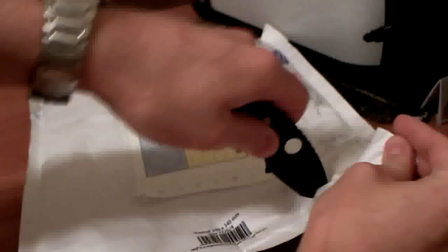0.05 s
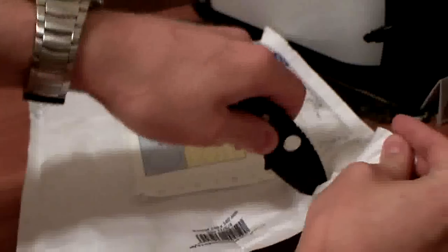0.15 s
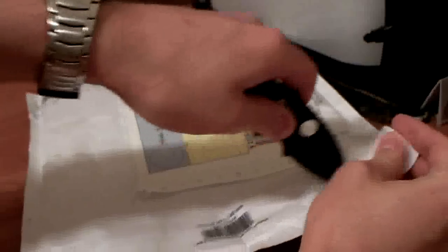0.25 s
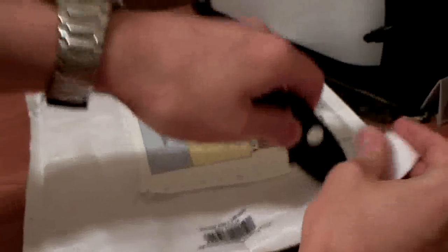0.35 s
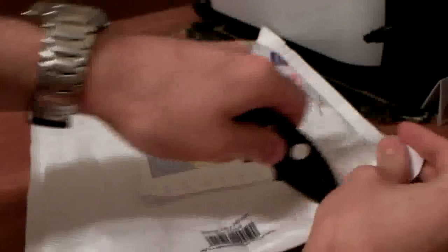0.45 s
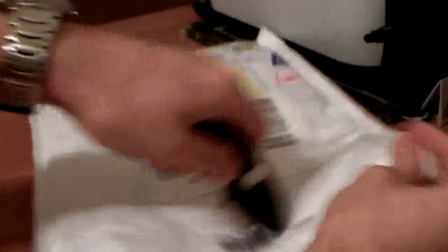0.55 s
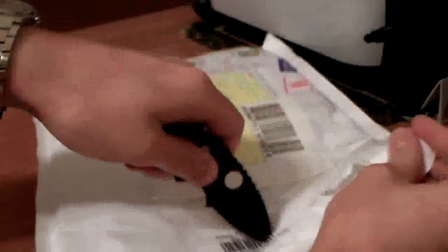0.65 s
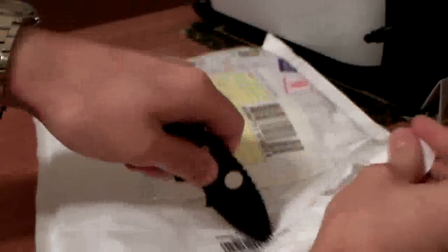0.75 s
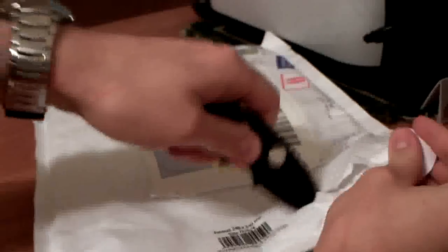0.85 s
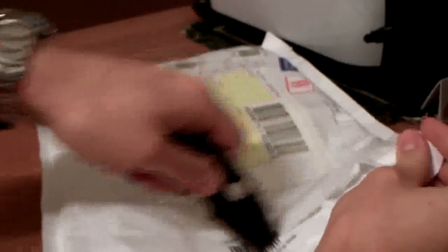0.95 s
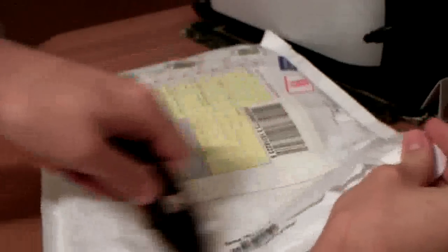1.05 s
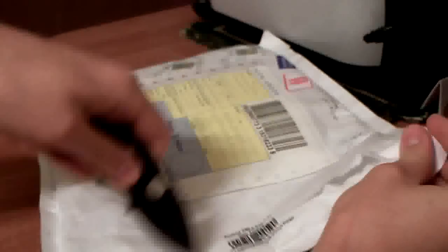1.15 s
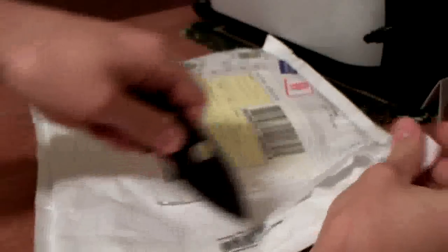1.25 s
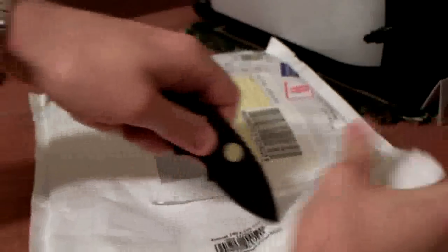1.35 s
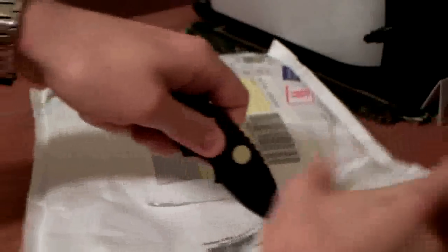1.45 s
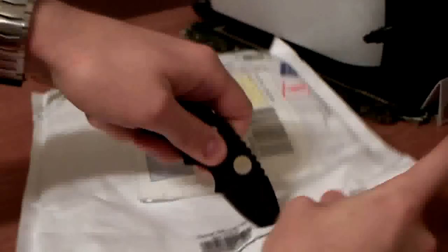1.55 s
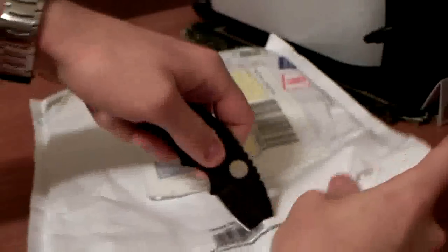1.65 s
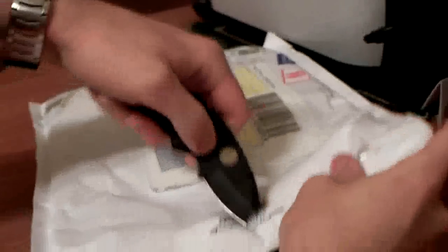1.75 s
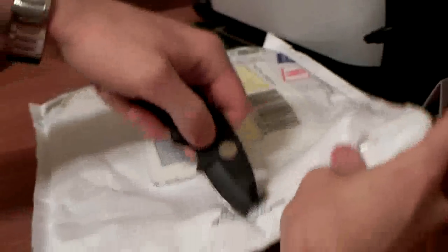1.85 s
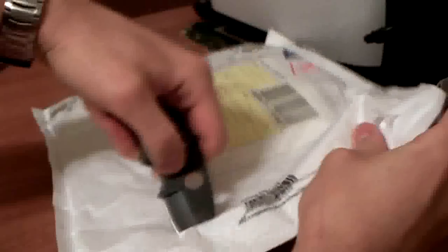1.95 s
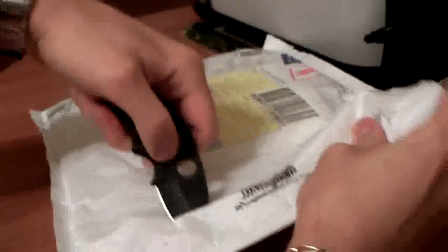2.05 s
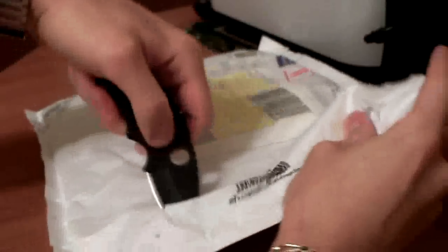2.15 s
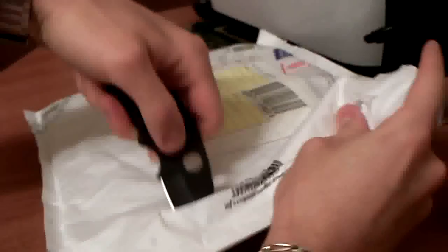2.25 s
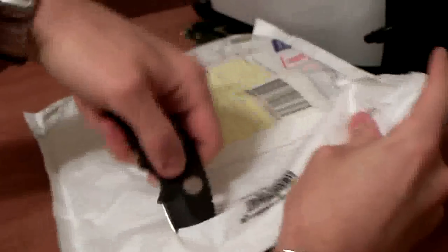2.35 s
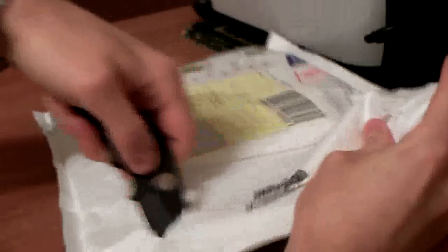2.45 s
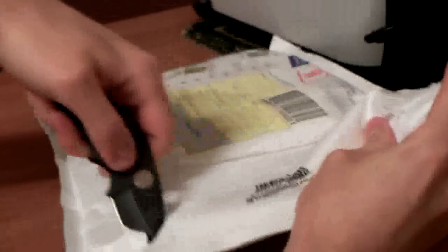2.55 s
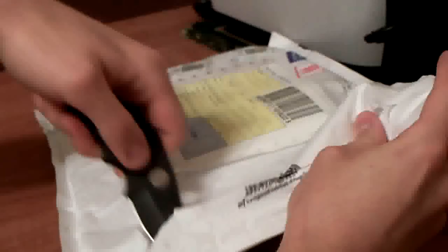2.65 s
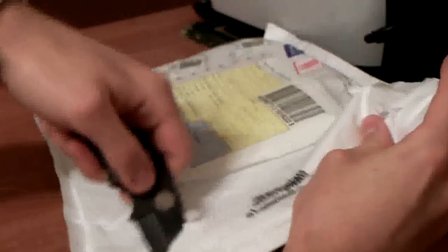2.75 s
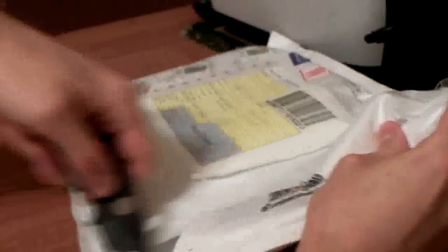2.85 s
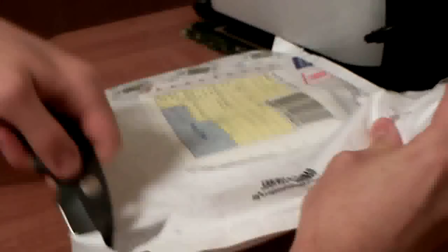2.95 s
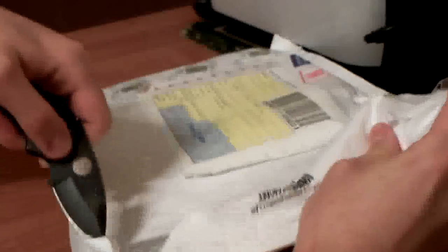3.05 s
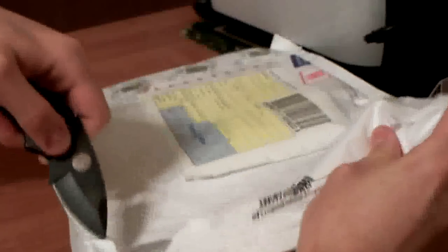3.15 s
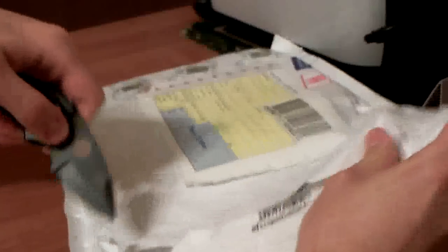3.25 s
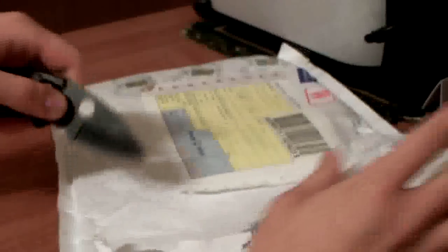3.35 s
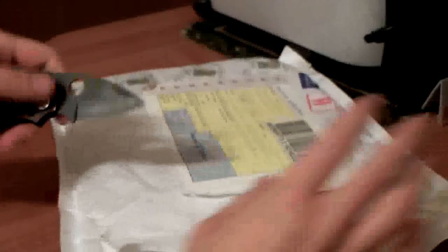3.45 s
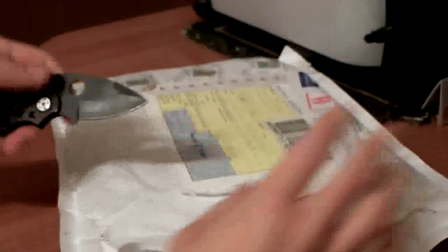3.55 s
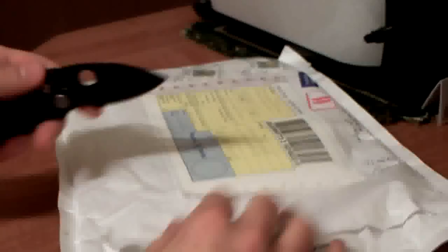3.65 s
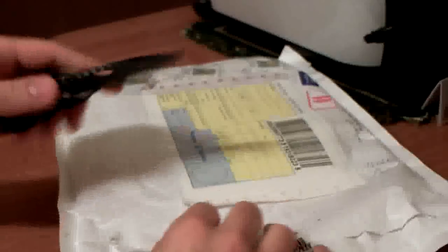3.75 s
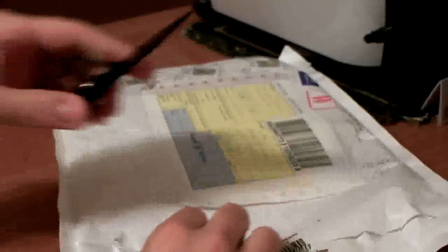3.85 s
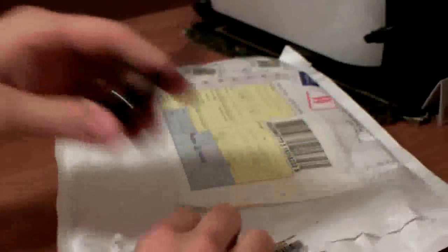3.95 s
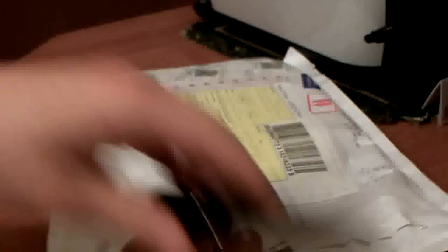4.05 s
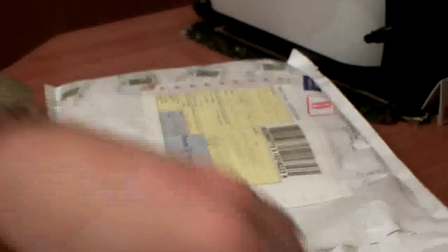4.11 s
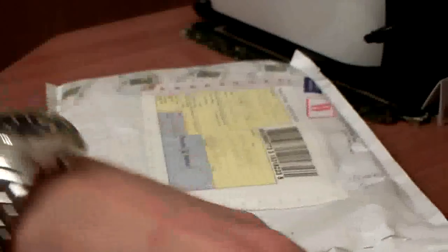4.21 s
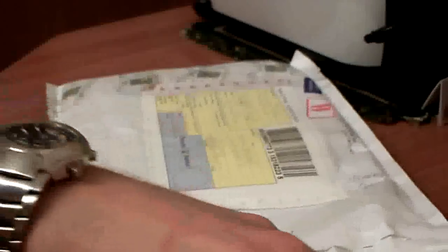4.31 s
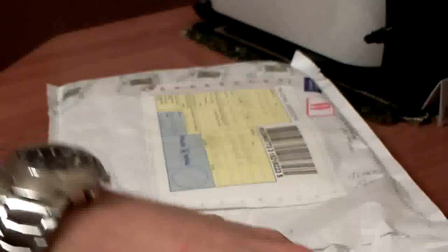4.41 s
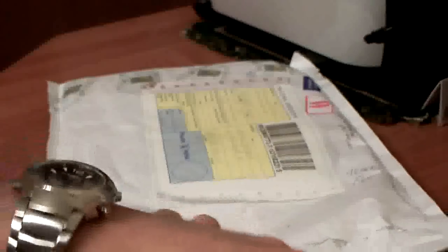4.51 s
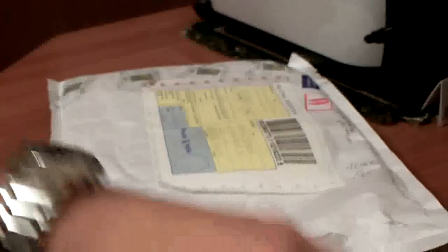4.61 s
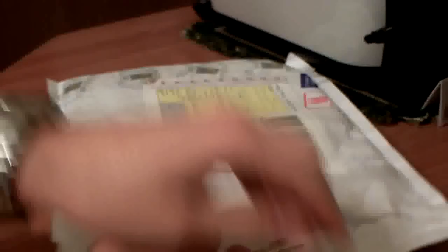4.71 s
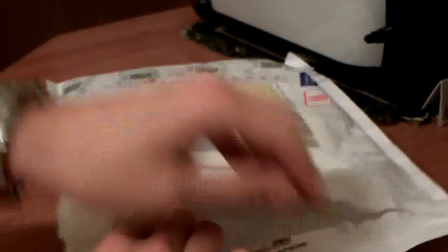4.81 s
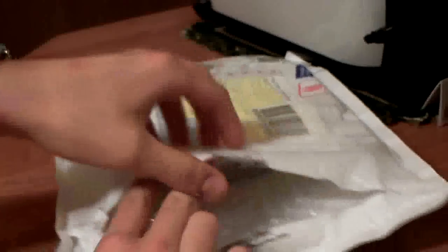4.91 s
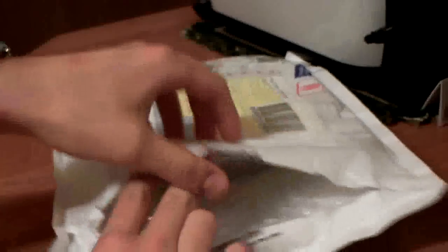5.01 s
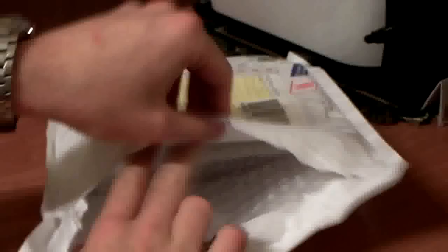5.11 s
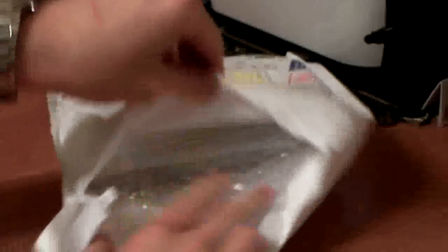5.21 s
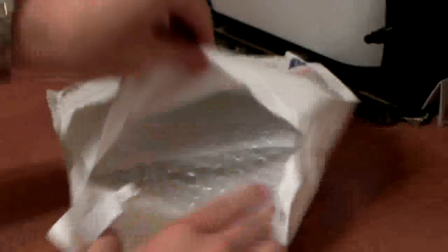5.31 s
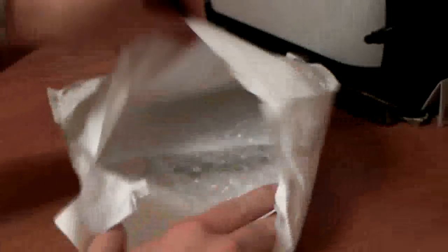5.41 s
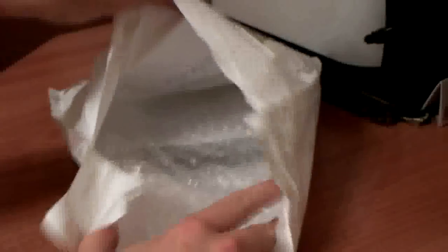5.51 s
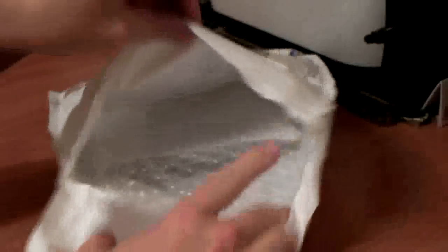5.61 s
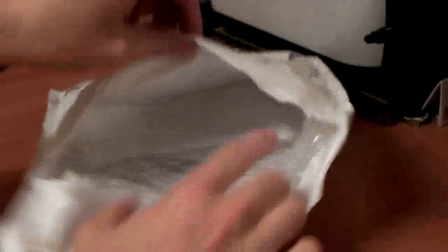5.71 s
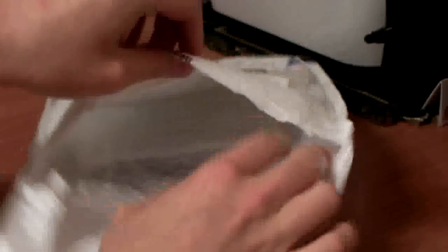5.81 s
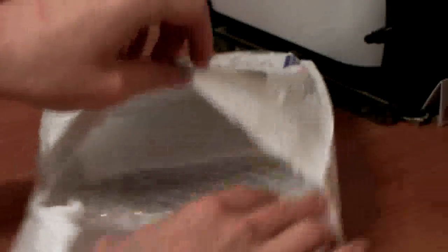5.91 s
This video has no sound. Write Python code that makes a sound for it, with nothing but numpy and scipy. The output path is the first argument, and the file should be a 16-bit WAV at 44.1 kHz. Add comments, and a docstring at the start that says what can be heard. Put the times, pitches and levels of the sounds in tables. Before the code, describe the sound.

Close by in a small room, a knife slits a padded paper mailer in short, uneven rips, with crackling fibres and snapping creases. The cutting eases into a softer rustle. The knife is put down on a wooden desk with a knock, and a hand thumps down just after. Then the mailer is pulled open with dense crinkling, sharp pops and a low, hollow rustle, over soft hiss and a faint hum.

```python
"""Short, crackly rips come first: a knife slits a padded paper mailer on a wooden desk.
The knife is laid down with a knock, a hand thumps onto the desk and pulls the mailer open.
Tearing fibres crackle, creases snap, the lining fizzes and the hollow pouch rustles low.
Behind it all is a small room with a soft hiss and a faint hum."""
import sys
import numpy as np
from scipy import signal
from scipy.fft import rfft, irfft
from scipy.io import wavfile
from scipy.ndimage import uniform_filter1d

SR = 44100
rng = np.random.default_rng(int(sys.argv[2]) if len(sys.argv) > 2 else 0)


def store_pcm(level_fs):
    """Save levels as 16-bit WAV."""
    pcm = np.round(np.clip(level_fs, -1, 1) * 32767).astype(np.int16)
    wavfile.write(sys.argv[1], SR, np.atleast_2d(pcm).T)


N = 263277

# The tone of the paper, lining, hollow pouch and desk beneath: f/Hz, relative level/dB
PAPER_TONE = [(760, -30), (1300, -2), (1450, -1.5), (2030, -6.5), (2210, -3.5), (2810, -4), (3050, -2.5),
              (3600, -13.5), (4680, -53), (7920, -120)]
LINING_TONE = [(2000, -32), (3400, -5), (3740, -0.5), (4460, -0.5), (4830, 3), (5730, 0), (7640, 3),
               (8150, 2.5), (9770, 4), (10300, 5), (11300, -9), (14700, -48), (22000, -120)]
POUCH_TONE = [(210, -42.5), (350, -1.5), (477, -16), (563, -1.5), (889, 0.5), (998, 4), (1260, -3),
              (1500, -10.5), (1950, -24), (3300, -120)]
THUD_TONE = [(35, -43), (60, -15), (194, -12.5), (345, -0.5), (387, 5.5), (420, -4), (550, -4.5),
             (920, -120)]
def mailer():
    """Tiny tears sound through the pouch, the paper, the lining and the desk beneath."""
    paper, lining, pouch = strokes()
    thud = gain_of(-37.5) * (pouch * gain_of(30)) ** 1.18  # grows faster than the pouch's sound
    folds = crackle(per_s=900, spread_db=3, low_hz=149.7, high_hz=1500, cycles=6.9, clump_db=.6, rub=1.86)
    creases = crackle(per_s=2200, spread_db=2.5, low_hz=1176, high_hz=3750,
                      cycles=7, clump_db=1.26, rub=1.74)
    fibres = crackle(per_s=2500, spread_db=2, low_hz=3350, high_hz=11950, cycles=37, clump_db=2, rub=1)
    out = pouch * evened(colour(folds, POUCH_TONE))
    out += thud * evened(colour(folds, THUD_TONE))
    out += paper * evened(colour(creases, PAPER_TONE))
    return out + lining * evened(colour(fibres, LINING_TONE))


# Pulls of the blade or hand, at full strength at t:
# t/s, swell/s, hold/s, paper level/dB, lining above paper/dB, pouch above paper/dB
PULLS = [(0.0, 0.013, 0.0033, -38, 2.5, -7), (0.086, 0.084, 0.07, -44.5, 3.5, -5),
         (0.175, 0.02, 0.0067, -23, 0, -5), (0.4, 0.044, .005, -46.5, -0.5, 0),
         (0.508, 0.037, .005, -53, -2, -12), (0.615, 0.041, 0.053, -32.5, -2, -9),
         (0.695, .01, 0.043, -22.5, 1.5, -6.5), (0.961, 0.058, .005, -42, -1.5, -3.5),
         (1.099, 0.065, 0.026, -42, -11, 3.5), (1.136, 0.064, .005, -30.5, 3.5, -8),
         (1.192, 0.054, 0.052, -27, 2, -4.5), (1.602, .01, 0.038, -46, -5, -6),
         (1.704, 0.092, .01, -46.5, 0, 1), (1.91, 0.18, 0.058, -45, 1.5, -2),
         (2.003, 0.046, 0.048, -40.5, 2.5, -0.5), (2.118, 0.068, .005, -30, -2.5, -2),
         (2.239, .02, .05, -41, -4, 2), (2.314, 0.043, .005, -38.5, -2.5, -1.5),
         (2.402, 0.061, .005, -45, 0.5, 1), (2.532, 0.039, .03, -45.5, -1, -2),
         (2.626, 0.089, .045, -26.5, 1, -1.5), (2.8, .03, 0.2, -48.5, -5, -4),
         (3.003, 0.038, 0.053, -30, 5, -2.5), (3.168, 0.056, 0.025, -41.5, 0.5, -1),
         (3.266, .03, .02, -51.5, -3, 6), (3.457, 0.13, 0.041, -48.5, -2, 0),
         (3.552, 0.018, 0.17, -45, 2.5, -4.5), (3.643, 0.097, 0.078, -54, -3, 14),
         (3.842, 0.19, 0.0046, -46, -2, 1.5), (4.087, 0.08, 0.24, -49.5, -4.5, -4.5),
         (4.33, 0.12, .005, -46.5, -3, -4), (4.433, 0.041, .005, -34.5, -6.5, 1.5),
         (4.505, .03, 0.0089, -52.5, -6, 12), (4.57, 0.053, 0.21, -49.5, -13, 5.5),
         (4.706, .02, 0.028, -40.5, 7.5, 17), (4.861, 0.094, 0.0055, -35.5, 1.5, -3),
         (4.955, 0.011, 0.012, -39.5, -8, 4), (5.037, 0.014, 0.0044, -29, 1, -0.5),
         (5.08, .03, .07, -39, -4.5, 1), (5.216, 0.024, 0.017, -35, 1.5, 0.5),
         (5.325, 0.031, .005, -40.5, -1, 7.5), (5.363, 0.013, 0.019, -27.5, -1, -2),
         (5.446, 0.057, 0.085, -28.5, -1, 2.5), (5.563, 0.071, 0.0058, -30.5, 4, 9.5),
         (5.679, 0.022, 0.039, -36.5, -1, 14), (5.803, .005, 0.024, -52, 7, 9),
         (5.886, 0.3, 0.045, -50, 3, 4)]
FADE_DB_PER_S, RESTING_DB = [195, 199, 234], [-59, -58.5, -59]  # paper, lining, pouch
def strokes():
    """Loudness of paper, lining and pouch: each pull swells, holds and fades, never quite to silence."""
    t = np.arange(0, N / SR + .001, .001)
    at, swell, hold, paper_db, lining_db, pouch_db = np.transpose(PULLS)[:, :, None]
    rising_db = 20 * np.minimum(t - at, 0) / np.maximum(swell, .003)  # climbs 20 dB during the swell
    fading_s = np.maximum(t - at - hold, 0)
    levels_db = [paper_db, paper_db + lining_db, paper_db + pouch_db]
    curves = []
    for db, fade, rest_db in zip(levels_db, FADE_DB_PER_S, RESTING_DB):
        power = (gain_of(db + rising_db - fade * fading_s) ** 2).sum(0) + gain_of(rest_db) ** 2
        curves.append(np.interp(np.arange(N) / SR, t, np.sqrt(power)))
    return curves


def crackle(per_s, spread_db, low_hz, high_hz, cycles, clump_db, rub):
    """Many tiny tears, each ringing briefly at its own pitch, come in clumps over a smooth rub."""
    size = gain_of(spread_db * np.minimum(rng.exponential(1, N), 4))  # a few are large
    tears = size * (rng.random(N) < per_s / SR) * rng.choice([-1., 1.], N)
    which_pitch = rng.integers(0, 24, N)
    pitches = np.geomspace(low_hz, high_hz, num=24)
    grains = sum(ring(tears * (which_pitch == k), hz, hz / cycles) for k, hz in enumerate(pitches))
    clumps = evened(uniform_filter1d(uniform_filter1d(rng.standard_normal(N), size=500), size=300))
    return evened(evened(grains * gain_of(clump_db * clumps)) + rub * rng.standard_normal(N))


# Creases and seams letting go: t/s, pop level/dB, crack level/dB, pop f/Hz
CREASE_SNAPS = [(0.084, -20.5, -43, 3150), (0.17, -16.5, -15.5, 750), (0.645, -20, -35, 1500),
                (0.697, -7.5, -15, 1420), (1.073, -36, -45, 4200), (1.139, -13, -32, 1990),
                (1.177, -17, -37, 2000), (1.191, -17, -21.5, 1390), (1.231, -21, -45, 560),
                (1.258, -24, -41, 1500), (1.328, -22, -50, 2100), (1.59, -22.5, -29, 3450),
                (1.786, -28, -50, 1260), (1.902, -31.5, -43, 630), (1.93, -25.5, -44, 2070),
                (1.992, -25.5, -30.5, 750), (2.098, -18, -36, 2170), (2.111, -15, -46, 1710),
                (2.12, -16, -40, 1190), (2.126, -22, -31, 1370), (2.247, -13, -48, 1210),
                (2.278, -21, -63, 2900), (2.328, -21.5, -54, 780), (2.398, -25, -48, 2500),
                (2.419, -24.5, -46, 1270), (2.543, -24, -31, 1910), (2.574, -20, -34, 900),
                (2.597, -17, -28, 1270), (2.622, -12.5, -31, 2050), (2.779, -26, -50, 1090),
                (2.806, -28.5, -52, 2000), (2.834, -32, -53, 900), (2.883, -30, -52, 2500),
                (2.968, -23, -42, 1390), (2.988, -20.5, -29.5, 1520), (3.032, -13, -21, 2240),
                (3.446, -28.5, -46, 950), (4.008, -33, -55, 1100), (4.817, -24, -38, 1290),
                (4.858, -23, -44, 1420), (4.957, -19.5, -54, 1030), (5.021, -15, -43, 1400),
                (5.038, -8.5, -23, 2150), (5.049, -12.5, -31, 1300), (5.074, -13, -30, 1420),
                (5.184, -18.5, -40, 1330), (5.213, -27, -28.5, 1130), (5.315, -28, -41, 980),
                (5.331, -9, -36, 940), (5.364, -12.5, -27, 2390), (5.381, -10.5, -33, 1130),
                (5.395, -13, -27, 1040), (5.432, -10.5, -44, 1670), (5.443, -13, -25, 1100),
                (5.455, -13, -27.5, 1090), (5.506, -17, -38, 950), (5.54, -15, -32, 640),
                (5.559, -22, -41, 1010), (5.572, -18, -45, 1010), (5.679, -14, -28, 990),
                (5.69, -23, -47, 1010), (5.719, -38, -46, 980), (5.789, -30, -48, 930),
                (5.893, -26.5, -54, 1350)]
# The bright edge of a snap or knock: f/Hz, relative level/dB
CRACK_TONE = [(1940, -33.5), (3300, -5), (3640, -5.5), (4840, -3.5), (6250, -6.5), (7590, -2), (9270, -4.5),
              (9910, -0.5), (11200, -9.5), (14600, -20), (22000, -120)]
def snaps():
    """A crease gives way with a crack; the freed paper rattles and pops at its own pitch."""
    out = np.zeros(N)
    for at, pop_db, crack_db, hz in CREASE_SNAPS:
        rattle = burst(fade_s=.04, count=6000)
        snap = rattle + 2 * burst(fade_s=.007, count=6000)  # a sharp start
        pop = ring(ring(snap, hz, hz / 1.36), hz, hz / 1.36)
        add(out, at, gain_of(pop_db) * pop / abs(pop).max())
        add(out, at, gain_of(crack_db) * colour(snap, CRACK_TONE))
    return out


# Knife and hand meeting the desk: t/s, ring level/dB, tick level/dB, dullness from 0 to 1
DESK_KNOCKS = [(4.338, -24.5, -51, 0.15), (4.403, -2, -15.5, 0.16), (4.408, 3, -22, 0),
               (4.688, -12, -42, 0.63), (4.694, -4, -43, 0.75), (4.699, -0.5, -14.5, 0.07),
               (4.703, -25, -38, 0), (4.710, -12, -32, 0), (4.717, -4.5, -35, 0.48)]
# The desk's own notes: f/Hz, relative level/dB, fade time before damping/s
DESK_NOTES = [(192, -12, 0.0094), (237, -9, 0.19), (422, -1, 0.13), (660, 11.5, 0.041), (753, 7, 0.076),
              (903, 16.5, 0.071), (1010, 4, 0.093), (1130, -24, 0.13), (1330, -29, .07), (1420, -15, 0.086),
              (1496, 5.5, 0.086), (1720, -6.5, 0.082), (2310, 1.5, 0.048), (2830, -3, 0.027),
              (2920, 0, 0.11), (3190, -12, 0.11), (5130, -17, .08), (5550, 0, 0.044), (5600, -21, 0.078),
              (6200, -9, 0.067)]
def knocks():
    """Each blow ticks and sets the desk ringing; a dull blow sounds deeper and dies sooner."""
    out = np.zeros(N)
    t = np.arange(9000) / SR
    hz, db, fade_s = np.transpose(DESK_NOTES)[:, :, None]
    for at, ring_db, tick_db, dull in DESK_KNOCKS:
        strength_db = db - 12 * dull * np.log2(hz / 700) + 2 * rng.standard_normal(hz.shape)
        damping = 2.5 + 0.75 * dull
        notes = gain_of(strength_db - 60 * t / fade_s * damping) * np.sin(2 * np.pi * hz * t)
        wood = notes.sum(0) * np.minimum(t / 0.00151, 1)
        wood = signal.lfilter(*signal.butter(2, 130, "high", fs=SR), wood)  # too small for deep bass
        tick = colour(burst(fade_s=0.019, count=9000), CRACK_TONE)
        add(out, at, gain_of(ring_db) * wood / abs(wood).max() + gain_of(tick_db) * tick)
    return out


JOLT_AT_S, JOLT_DB, JOLT_HZ, JOLT_FADE_S = 4.699, -26, 62, 0.073
def jolt():
    """The landing hand gives the desk a short, deep shake."""
    t = np.arange(9000) / SR
    return gain_of(JOLT_DB - 60 * t / JOLT_FADE_S) * np.sin(2 * np.pi * JOLT_HZ * t)


# How long the room rings: f/Hz, time to fade by 60 dB/s
ROOM_FADES = [(250, 0.28), (1000, 0.14), (4000, 0.19), (10000, 0.17)]
def room(x):
    """Many small echoes blur into a short tail; the low notes last longest."""
    echoes = np.zeros(SR // 2)
    at = np.arange(200, len(echoes) - 20, 20)
    echoes[at + rng.integers(0, 20, len(at))] = rng.choice([-1., 1.], len(at))
    hz, t, bands = signal.stft(echoes, SR, nperseg=256)
    fade = gain_of(-60 * t / read(ROOM_FADES, hz)[:, None])
    tail = signal.istft(bands * fade, SR, nperseg=256)[1]
    return signal.fftconvolve(x, tail / np.linalg.norm(tail))[:N]


# The tone of the room's air: f/Hz, relative level/dB
AIR_TONE = [(15, -45), (25, 4), (219, -6.5), (364, -5), (424, -1), (576, -2.5), (725, -6), (802, 4),
            (935, 1), (1040, 2), (2950, -7.5), (9770, -7.5), (11100, -12.5), (14400, -64), (22000, -120)]
# The notes of the hum: f/Hz, level/dB
HUM_NOTES = [(797, -60), (1596, -71)]
def background():
    """Steady air and hiss, with a faint hum that wavers slightly."""
    air_gain = gain_of(read(AIR_TONE, np.fft.rfftfreq(N, 1 / SR)))
    out = gain_of(-51) * evened(irfft(rfft(rng.standard_normal(N)) * air_gain, N))
    for hz, db in HUM_NOTES:
        wander = np.cumsum(rng.standard_normal(N)) * .011
        out += gain_of(db) * np.sqrt(2) * np.sin(2 * np.pi * hz * np.arange(N) / SR + wander)
    return out


def gain_of(db):
    """Turns decibels into a number to multiply by."""
    return 10 ** (np.asarray(db) / 20)


def evened(x):
    """Scales a sound to an average power of 1."""
    return x / np.sqrt(np.mean(x ** 2) + 1e-20)


def read(points, hz):
    """Looks up a pitch in a table, gliding between its rows."""
    f, value = np.transpose(points)
    return np.interp(np.log(hz + 1), np.log(f + 1), value)


def add(mix, s, sound):
    """Mixes a sound in at s seconds."""
    part = mix[round(s * SR):][:len(sound)]
    part += sound[:len(part)]


def colour(x, tone):
    """Gives a sound the tone in a table, without smearing it earlier in time."""
    db = read(tone, abs(np.fft.fftfreq(8192, 1 / SR)))
    log_gain = np.log(gain_of(np.maximum(db, -70)))
    taps = np.fft.ifft(np.exp(np.conj(signal.hilbert(log_gain)))).real[:2048]
    return signal.oaconvolve(x, taps / np.linalg.norm(taps))[:len(x)]


def burst(fade_s, count):
    """Noise that starts at once and drops 60 dB in fade_s."""
    return rng.standard_normal(count) * gain_of(-60 * np.arange(count) / SR / fade_s)


def ring(x, hz, width_hz):
    """Makes a sound ring at one pitch; a narrower width rings longer."""
    pole = np.exp((2j * np.pi * hz - np.pi * width_hz) / SR)
    return np.sqrt(2 * (1 - abs(pole) ** 2)) * signal.lfilter([1], [1, -pole], x).real


def scene():
    """Mailer and desk close by, the room behind them."""
    near = mailer() + snaps() + knocks()
    add(near, JOLT_AT_S, jolt())
    return (gain_of(-3) * near + gain_of(-12) * room(near) + background())[None]


def record(dry):
    """A small microphone drops the deep bass; hard peaks are rounded and the highest treble is cut."""
    thinned = signal.lfilter(*signal.butter(1, 70, "high", fs=SR), dry)
    rounded = .75 * np.tanh(thinned / .75)
    treble_cut = signal.firwin(601, 11230, window=("kaiser", 6), fs=SR)
    return signal.oaconvolve(rounded, treble_cut[None], "same")


dry = scene()
out = record(dry)
store_pcm(out)
```